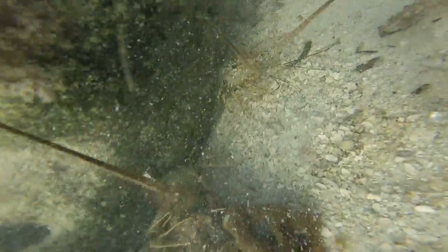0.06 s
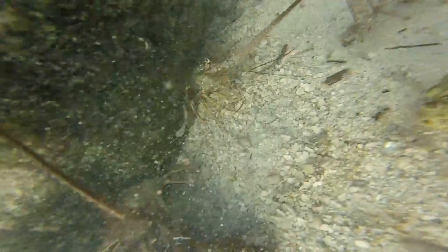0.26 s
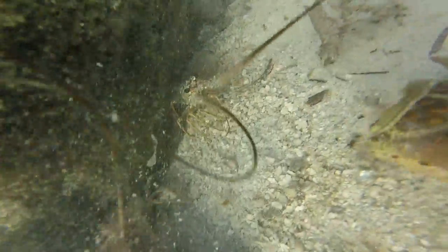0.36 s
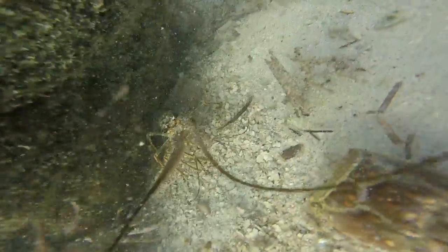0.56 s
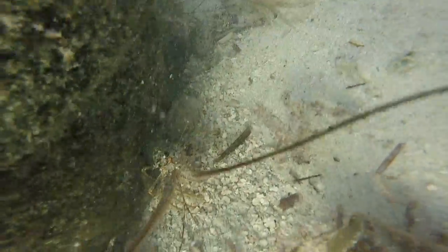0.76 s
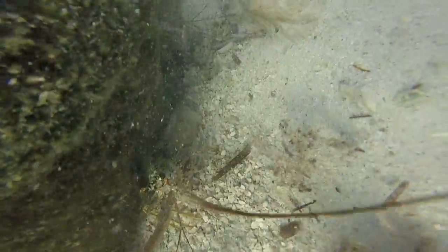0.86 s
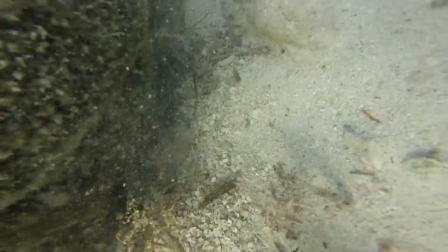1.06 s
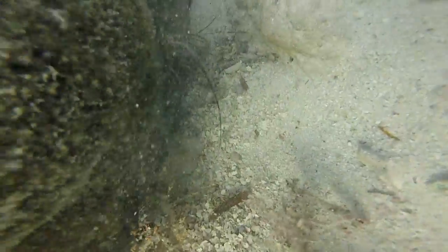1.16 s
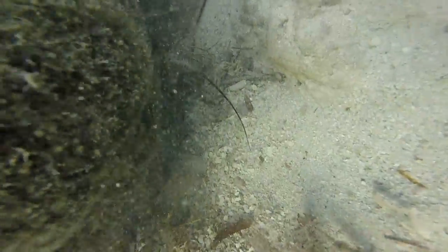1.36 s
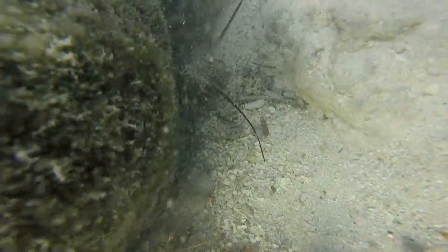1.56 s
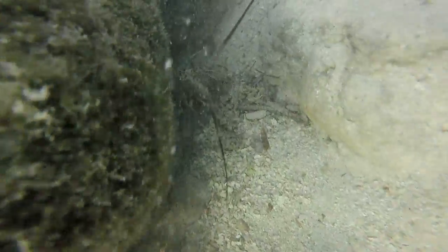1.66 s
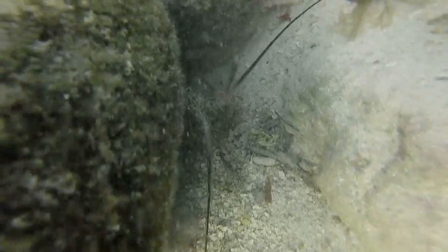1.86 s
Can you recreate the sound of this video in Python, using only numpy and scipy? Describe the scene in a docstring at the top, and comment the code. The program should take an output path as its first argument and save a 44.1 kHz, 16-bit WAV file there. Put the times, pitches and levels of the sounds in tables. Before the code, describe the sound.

A rough scrape ending in a hard clack on an underwater camera case, later a single knock

```python
"""Underwater housing scraped along a rock

A camera housing scrapes roughly (dense slips, a decaying noise grab, low shudder), knocks at the end of
the scrape and again later (contact pulses ringing shell modes). Low shoves on the case and gurgling
bubbles are damped sines; tiny snaps are short noise bursts. Behind them the water is three bands of
noise: rumble, hollow middle and faint hiss. A low-pass ends the chain.
"""
import sys
import numpy as np
from scipy import signal
from scipy.fft import rfft, irfft
from scipy.io import wavfile

SR = 44100
rng = np.random.default_rng(int(sys.argv[2]) if len(sys.argv) > 2 else 0)


def to_wav(sig):
    """Store sig (one row per channel, or 1-D mono) as 16-bit WAV at the path in sys.argv[1].

    Samples outside -1..1 are clipped; the rate is SR.
    """
    pcm = np.clip(np.atleast_2d(sig), -1, 1) * 32767
    pcm = np.round(pcm).astype(np.int16)
    wavfile.write(sys.argv[1], SR, pcm.T)  # frames by channels


N = 83790
T = np.arange(N) / SR


def friction():
    """Dense uneven slips plus hiss ring in the housing, during the scrape and the light brushes."""
    # scrape level: t/s, level/dB
    scrape = [(.198, -62), (.202, -35), (.213, -36.5), (.243, -37), (.259, -25.5), (.27, -22.5),
              (.286, -22), (.305, -22), (.329, -29.5), (.335, -54), (.365, -56)]
    # relative scrape spectrum: f/Hz, density/dB
    scrape_colour = [(100, -52), (300, 9), (480, 6), (700, 2), (900, -5), (1300, -3.5), (1570, 3),
                     (2000, -1), (2700, -2), (3300, -13), (3800, -14), (4150, -10), (4700, -22.5),
                     (6500, -23), (8200, -25.5), (9500, -33), (11500, -34), (15000, -47)]
    # light brushes: centre t/s, half length (to 1/e)/s, level/dB
    brushes = [(.008, 0.0097, -53.5), (0.054, 0.014, -56.5), (.127, 0.003, -45.5), (0.161, 0.017, -46.5),
               (0.724, 0.015, -51), (0.822, 0.028, -50.5), (0.892, 0.01, -57), (1.133, 0.06, -59),
               (1.229, 0.026, -54), (1.564, 0.0051, -53)]
    slips_per_s, slip_spread_db, hiss_gain = 1100, 2.5, 0.51
    case_t60_s, case_ring_gain = 0.052, 0.59
    clump_db, clump_s = 1, 0.0029

    sizes = amp(slip_spread_db * np.minimum(rng.exponential(1, N), 4))
    slips = sizes * rng.choice([-1, 1], N) * (rng.random(N) < slips_per_s / SR)
    drive = evened(slips) + hiss_gain * rng.standard_normal(N)

    ring = rng.standard_normal(N) * amp(-60 * T / case_t60_s)
    ring /= np.linalg.norm(ring)
    drive = drive + case_ring_gain * signal.fftconvolve(drive, ring)[:N]

    force = level(scrape) * (T > scrape[0][0]) * (T < scrape[-1][0])
    for centre_s, half_s, db in brushes:
        force = force + amp(db) * np.exp(-((T - centre_s) / half_s) ** 2)
    clumps = amp(clump_db * wander(clump_s))
    return force * coloured(drive * clumps, scrape_colour)


def catch():
    """First grab of the scrape: noise in the hollow resonances, fast rise, exponential decay."""
    # relative spectrum of the grab: f/Hz, density/dB
    catch_colour = [(100, -19), (170, 1), (270, -12), (370, -3), (460, 4.5), (560, -5.5), (680, -18.5),
                    (900, -19), (1100, -13.5), (1330, -22), (1520, -7.5), (1660, -2.5), (1900, -22.5),
                    (2700, -28.5), (4100, -29.5), (6000, -49), (15000, -68)]
    start_s, rise_s, t60_s, level_db = 0.1995, 0.0014, 0.1, -17
    t = np.maximum(T - start_s, 0)
    rise = np.minimum(t / rise_s, 1)
    return rise * amp(level_db - 60 * t / t60_s) * noise(catch_colour)


def buffeting():
    """The dragging housing shudders at low pitch: coloured noise under a level curve."""
    # shudder level: t/s, level/dB
    buffet = [(.19, -42), (.205, -35), (.245, -41), (.27, -28.5), (.3, -16), (.335, -26), (.355, -58),
              (.39, -77)]
    # relative shudder spectrum: f/Hz, density/dB
    buffet_colour = [(15, -10.5), (45, 15), (85, -17), (125, 0), (170, -0.5), (220, -4), (300, -10.5),
                     (500, -16.5), (900, -36), (2000, -76)]
    return level(buffet) * noise(buffet_colour)


def knock(peak_db, contact_ms, shell_db):
    """A short contact pushes the case and rings its shell and mount; longer contact is duller."""
    # shell modes: f/Hz, level/dB, t60/s
    shell_modes = [(493, -18.5, 0.024), (626, -7, 0.014), (1170, -4, 0.0037), (1520, -8, 0.018),
                   (2140, -13, 0.028), (2616, -8.5, 0.012), (3320, -13, .007), (3880, -12, 0.014)]
    push_s, push_db = 0.00024, 3
    mount_hz, mount_t60_s, mount_db = 157.5, 0.045, -9

    t = T[:SR // 6]
    shell = sum(amp(db - 60 * t / t60_s) * np.cos(2 * np.pi * hz * t) for hz, db, t60_s in shell_modes)
    mount = amp(mount_db - 60 * t / mount_t60_s) * np.cos(2 * np.pi * mount_hz * t)
    push = amp(push_db) * np.exp(-t / push_s)
    body = amp(shell_db) * shell + mount + push

    u = t * 1000 / contact_ms
    contact = u ** 4 * np.exp(-4 * u)  # force peaks at contact_ms
    hit = signal.fftconvolve(body, contact)[:len(t)]
    return -amp(peak_db) * hit / abs(hit).max()


def swing(db, hz, t60_s, rise_s, sag=0):
    """Damped sine with a soft start, pitch sinking by the share sag: a shove of water or a gurgle."""
    sag_s = 0.052
    t = T[:SR // 3]
    pitch_hz = hz * (1 - sag * (1 - np.exp(-t / sag_s)))
    turns = np.cumsum(pitch_hz) / SR
    attack = np.sin(np.pi / 2 * np.minimum(t / rise_s, 1)) ** 2
    decay = amp(db - 60 * np.maximum(t - rise_s, 0) / t60_s)
    return decay * attack * np.sin(2 * np.pi * turns)


def snap(peak_db, hz, octaves):
    """Tiny crack: a few milliseconds of random-phase noise around one pitch."""
    rise_s, t60_s = 0.00049, 0.012
    t = T[:2048]
    f = np.fft.rfftfreq(len(t), 1 / SR)
    shape = np.exp(-(np.log2((f + 1) / hz) / octaves) ** 2)
    crack = irfft(shape * np.exp(2j * np.pi * rng.random(len(f))))
    crack = crack * amp(-60 * t / t60_s) * (1 - np.exp(-(t / rise_s) ** 2))
    return amp(peak_db) * crack / abs(crack).max()


def water():
    """Water moving past the case: fluttering rumble and hollow middle, plus steadier faint hiss."""
    # water levels: t/s, rumble/dB, middle/dB, hiss/dB
    water_levels = [(0, -43, -43.5, -61), (.2, -44.5, -50, -59), (.38, -57, -48, -65.5),
                    (.48, -52, -50, -64.5), (.6, -49.5, -43.5, -62), (.76, -44, -47.5, -62.5),
                    (.92, -35.5, -44, -61), (1.04, -40.5, -44, -60.5), (1.22, -40, -46.5, -61.5),
                    (1.35, -42, -44.5, -60.5), (1.5, -36, -51, -59.5), (1.7, -44, -45, -62.5),
                    (1.9, -41.5, -46, -60.5)]
    # relative spectra of the three bands: f/Hz, density/dB
    rumble_colour = [(12, -0.5), (35, 2), (60, -3), (100, -8), (150, -3), (210, -13.5), (300, -19.5),
                     (700, -15), (2000, -74)]
    hum_colour = [(100, 1.5), (280, -8), (420, 4.5), (560, -7), (700, -9.5), (900, -29.5), (1500, -32),
                  (4000, -52.5)]
    hiss_colour = [(300, -21), (900, 1.5), (1600, 0.5), (2650, -2), (3100, -7), (4200, -9.5), (5000, -12.5),
                   (8000, -17), (12000, -25.5), (15000, -32)]
    flutter_db, flutter_s = 2.23, 0.015

    s, rumble_db, hum_db, hiss_db = np.transpose(water_levels)
    rumble = amp(np.interp(T, s, rumble_db)) * noise(rumble_colour)
    hum = amp(np.interp(T, s, hum_db)) * noise(hum_colour)
    hiss = amp(np.interp(T, s, hiss_db)) * noise(hiss_colour)
    return (rumble + hum) * amp(flutter_db * wander(flutter_s)) + hiss


def amp(db):
    """Decibels to gain."""
    return 10 ** (np.asarray(db) / 20)


def evened(x):
    """Scales to rms 1."""
    return x / np.sqrt(np.mean(x ** 2) + 1e-20)


def level(points):
    """Gain over time from rows of t/s, level/dB."""
    return amp(np.interp(T, *np.transpose(points)))


def coloured(x, points):
    """Filters x by rows of f/Hz, gain/dB, interpolated over log frequency; rms 1."""
    hz, db = np.transpose(points)
    f = np.fft.rfftfreq(len(x), 1 / SR)
    gain = amp(np.interp(np.log(f + 1), np.log(hz), db))
    return evened(irfft(rfft(x) * gain, len(x)))


def noise(points):
    """Gaussian noise with the given spectrum, rms 1."""
    return coloured(rng.standard_normal(N), points)


def wander(seconds):
    """Random drift of rms 1: noise through two equal one-pole low-passes of this time constant."""
    pole = np.exp(-1 / (seconds * SR))
    return evened(signal.lfilter([1], np.poly([pole, pole]), rng.standard_normal(N)))


def add(mix, s, sound):
    """Mixes a sound in at s seconds, cut at the end of the mix."""
    part = mix[max(round(s * SR), 0):][:len(sound)]
    part += sound[:len(part)]


def scene():
    """Everything reaches the one microphone inside the housing."""
    # knocks and dull bumps: t/s, peak/dB, contact/ms, shell mode level/dB
    knocks = [(.2025, -17.5, 0.11, -2), (0.2875, -12, 1.34, -19), (0.2951, -13, 0.12, 20),
              (0.3044, -14.5, 1.12, -6), (.3138, -9.5, 0.15, -13), (0.3153, -1.5, 0.2, 13),
              (.3159, -4, 0.23, 5.5), (.332, -11.5, 1.36, -14), (0.5391, -33, 0.54, 17),
              (1.5006, -22.5, 0.11, 10), (1.5019, -5.5, 0.38, 1), (1.5034, -15, 0.4, -17)]
    # low shoves on the case moving through water: t/s, level/dB, f/Hz, t60/s
    shoves = [(0.043, -22, 41, 0.067), (0.15, -22, 53.2, 0.11), (.285, -10, 49.1, 0.22),
              (0.2951, -8, 116.2, 0.11), (.331, -15.5, 69.5, 0.043), (.362, -24, 53.4, 0.076),
              (0.678, -33, 93.5, .06), (.796, -25, 60, .06), (1.162, -31.5, 66, 0.045),
              (1.207, -26.5, 39, 0.24), (1.479, -26, 117.6, .08), (1.504, -18.5, 62, 0.11),
              (1.55, -27, 46.6, 0.4), (1.57, -30.5, 107.5, 0.15)]
    # gurgling bubbles: t/s, level/dB, starting f/Hz, t60/s
    bubbles = [(.026, -34.5, 524, .05), (.147, -27.5, 445, 0.073), (.566, -33, 476, 0.065),
               (.601, -29, 425, 0.14), (.618, -31, 389, 0.11), (.63, -26.5, 495, 0.057),
               (.659, -32.5, 377, 0.086), (1.413, -34, 591, 0.023)]
    # tiny snaps: t/s, peak/dB, centre f/Hz, half width (to 1/e)/octaves
    snaps = [(.053, -40.5, 3100, 0.77), (0.3553, -49, 3360, 0.27), (.514, -49.5, 8900, 0.45),
             (.537, -49, 2020, .3), (.768, -63, 13000, .15), (0.9787, -41.5, 2315, .25),
             (1.107, -59, 13000, .2), (1.876, -59, 7900, 0.24)]

    mix = friction() + catch() + buffeting() + water()
    for s, *row in knocks:
        add(mix, s, knock(*row))
    for s, *row in shoves:
        add(mix, s, -swing(*row, rise_s=0.0034))
    for s, *row in bubbles:
        add(mix, s, swing(*row, rise_s=0.0044, sag=0.12))
    for s, *row in snaps:
        add(mix, s, snap(*row))
    return mix[None]


def record(dry):
    """The recorder's band limit: a linear-phase low-pass."""
    edge_hz = 15300
    lowpass = signal.firwin(511, edge_hz, window=("kaiser", 9), fs=SR)
    return signal.oaconvolve(dry, lowpass[None], "same")


dry = scene()
out = record(dry)
to_wav(out)
```